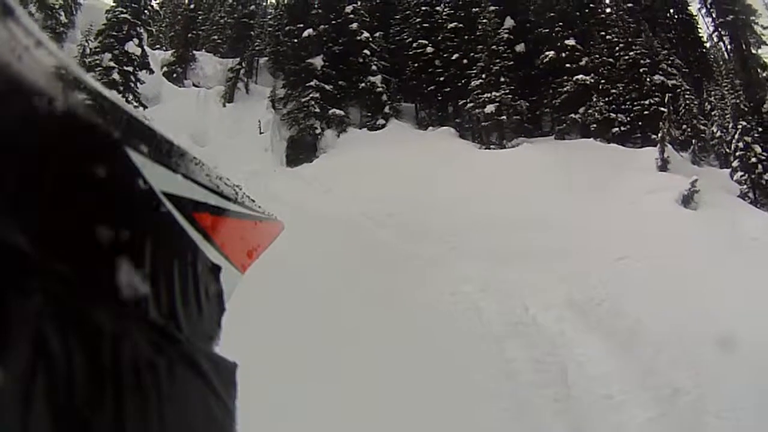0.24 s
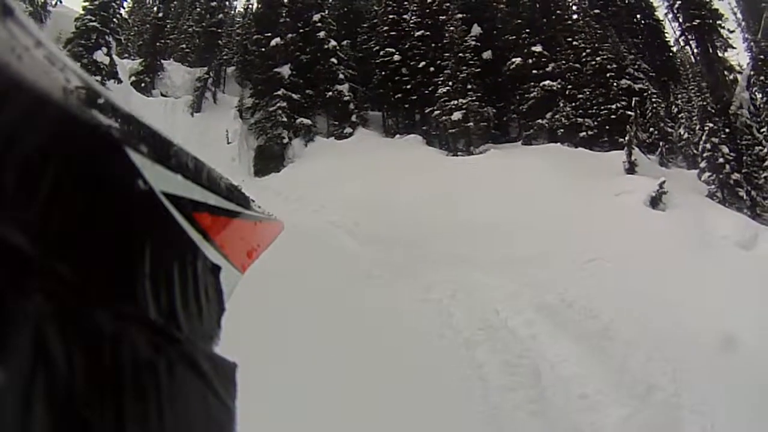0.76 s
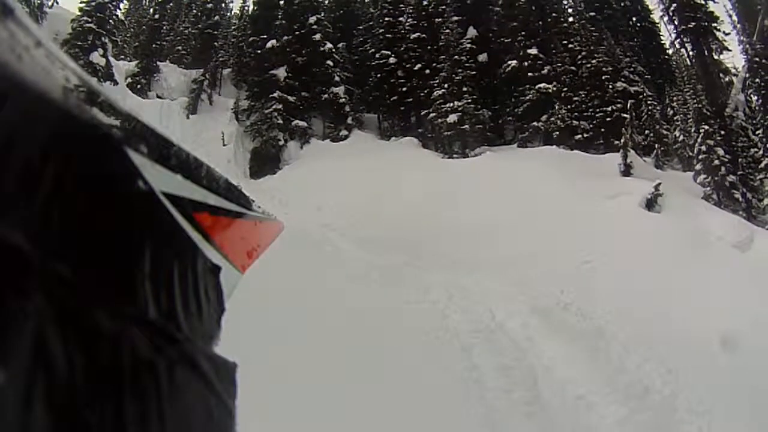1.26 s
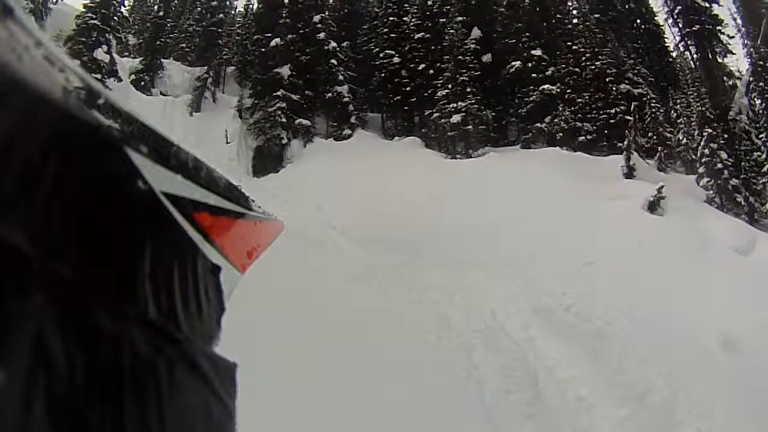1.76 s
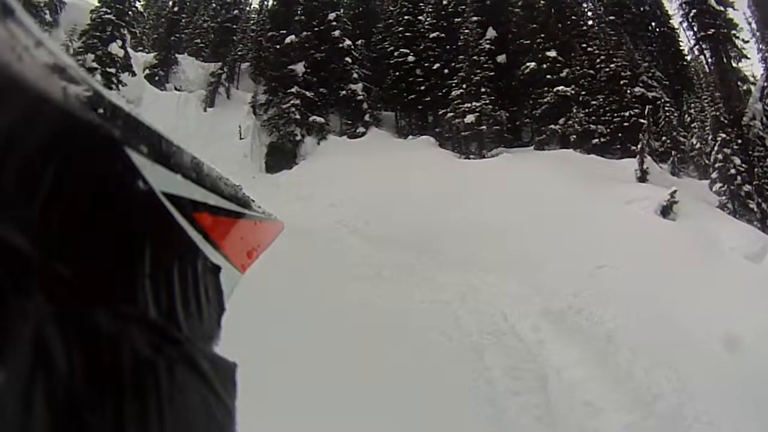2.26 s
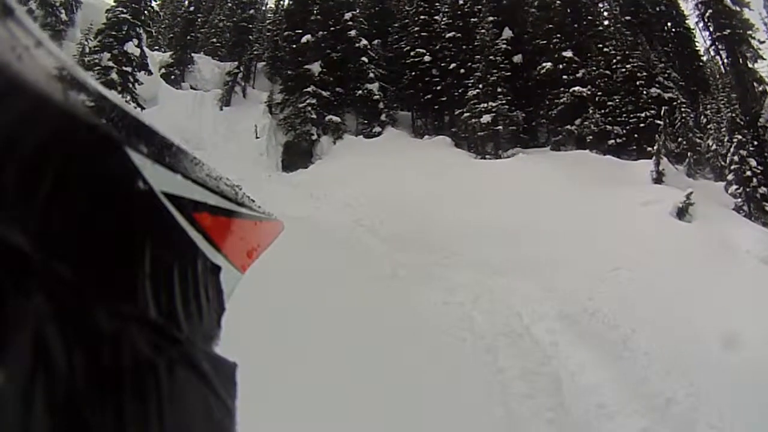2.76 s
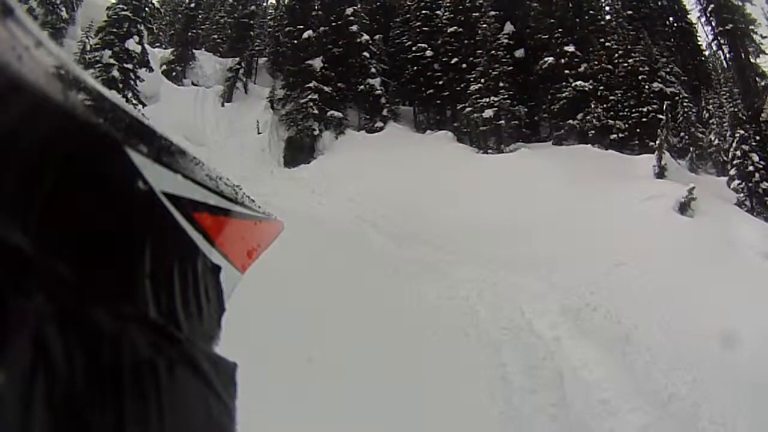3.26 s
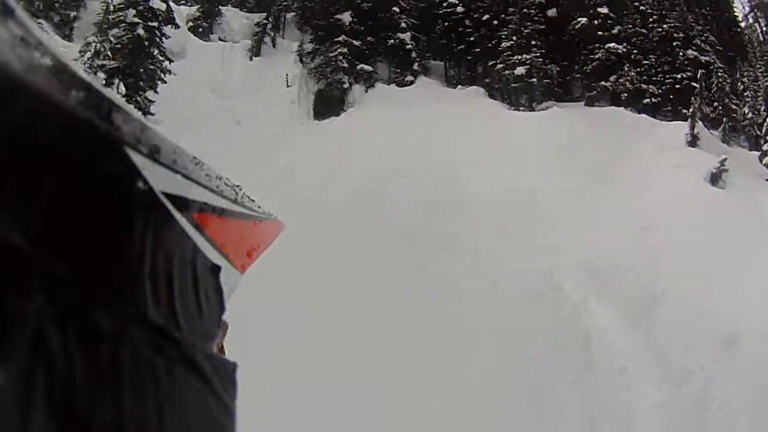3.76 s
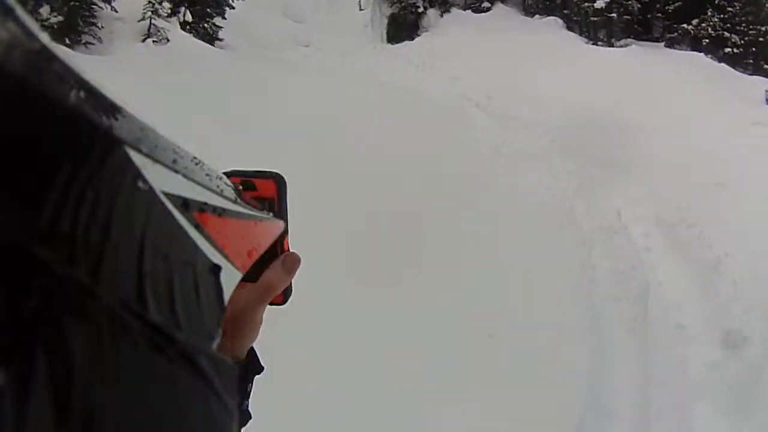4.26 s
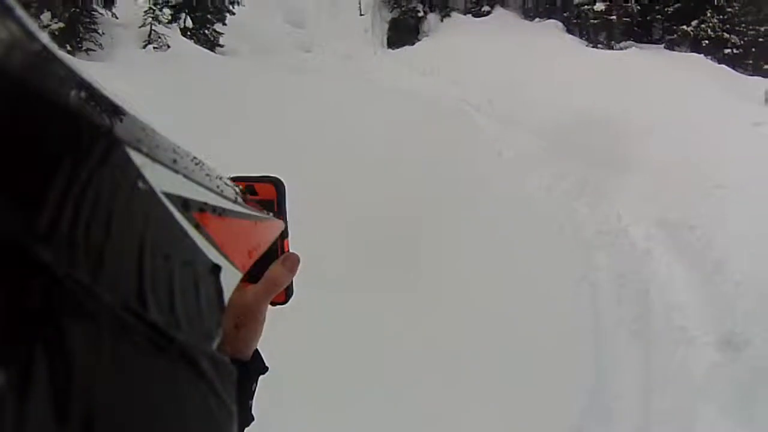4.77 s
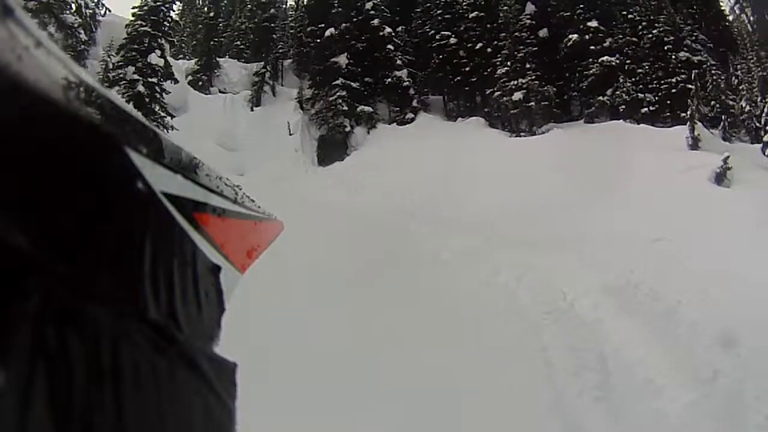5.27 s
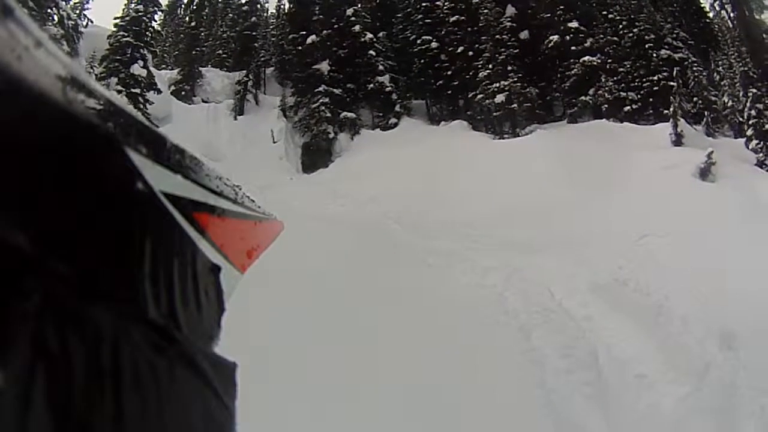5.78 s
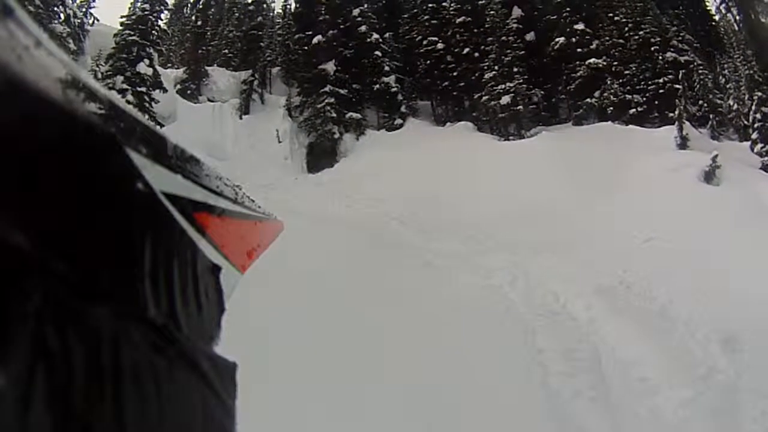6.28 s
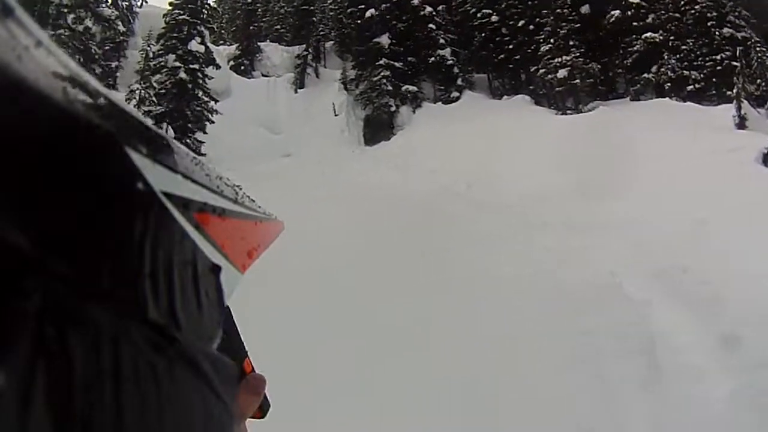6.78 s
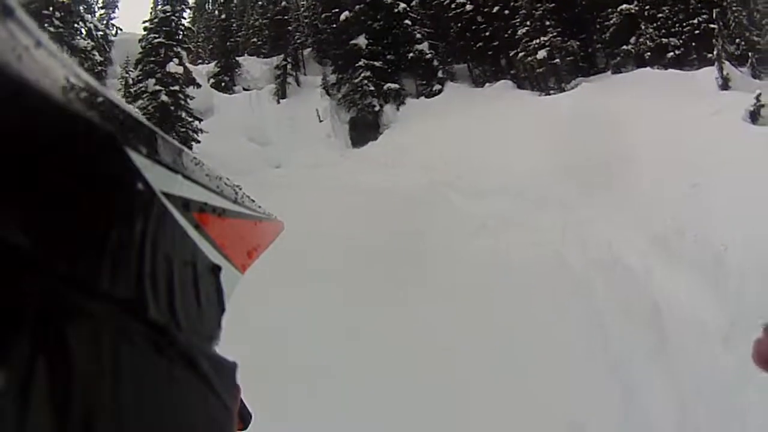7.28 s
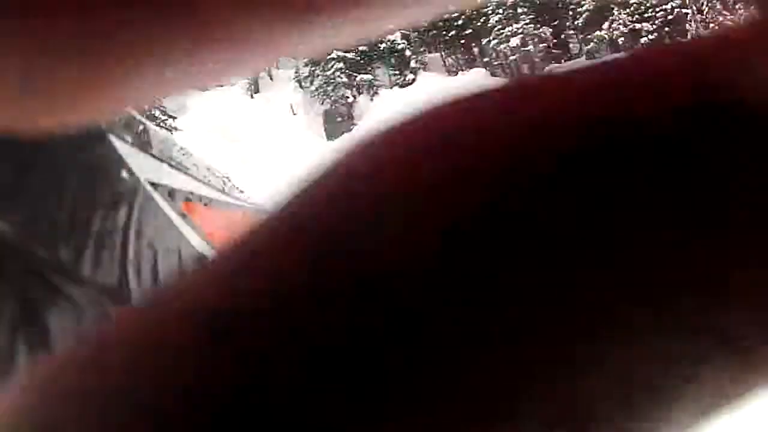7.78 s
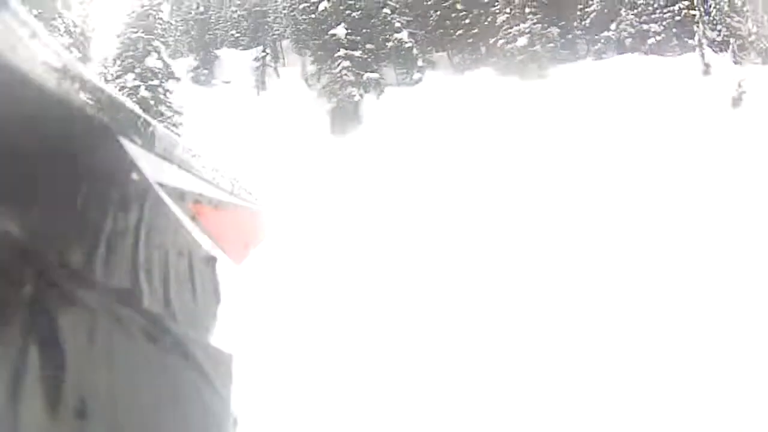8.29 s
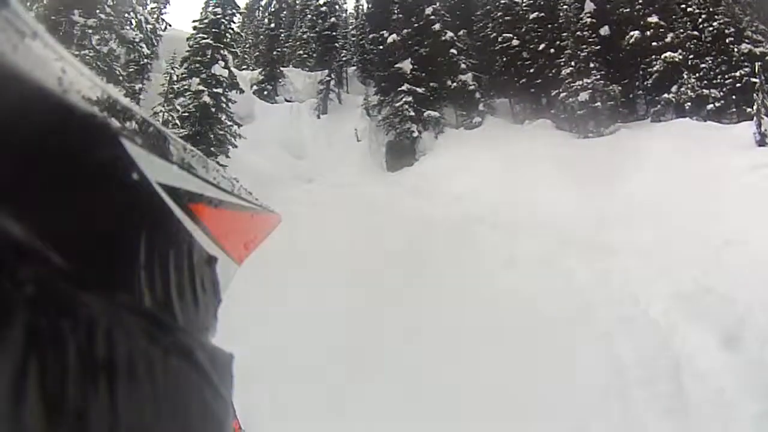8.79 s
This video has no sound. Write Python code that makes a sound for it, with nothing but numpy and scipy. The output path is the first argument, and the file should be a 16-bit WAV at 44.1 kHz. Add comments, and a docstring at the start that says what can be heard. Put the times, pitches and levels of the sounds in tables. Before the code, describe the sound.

Rough two-stroke idle putters and clatters steadily over faint hiss, then fingers rub, swish and knock loudly on the microphone's plastic case around eight seconds.

```python
"""A two-stroke twin snowmobile idles on open snow, heard from a camera worn by the rider.
Most firings are weak; about ten times a second one catches well, thumps in the exhaust and clacks the clutch.
One uneven firing sequence drives the exhaust tones and thumps, and shakes filtered noise into rattles.
Near the end a hand scrapes the camera housing, a sleeve swishes past and fingers knock on the case:
shaped noise and ringing sines. Dry clicks, hiss, low rumble and a thin whine complete the scene."""
import sys
import numpy as np
from scipy import signal
from scipy.fft import rfft, irfft
from scipy.io import wavfile
from scipy.ndimage import uniform_filter1d

SR = 44100
rng = np.random.default_rng(int(sys.argv[2]) if len(sys.argv) > 2 else 0)


def digitize_waveform(pressure):
    """Quantize a signal to 16-bit integers and store it at the path in sys.argv[1].

    Rows of a 2-D input are taken as channels; values are limited to [-1, 1].
    """
    field = np.atleast_2d(pressure).T
    bounded = np.clip(field, -1, 1)
    quanta = np.round(bounded * 32767).astype(np.int16)
    wavfile.write(sys.argv[1], SR, quanta)


N = 398663
TIME = np.arange(N) / SR  # seconds


def undb(db):
    """Turn decibels into gain."""
    return 10 ** (np.asarray(db) / 20)


def level(x, db=0):
    """Scale a sound to an rms level in dB."""
    return x * undb(db) / np.sqrt(np.mean(x ** 2))


def colour(x, points):
    """Filter by a spectrum of (Hz, dB) points that falls away beyond its ends."""
    hz, db = np.transpose(points)
    f = np.maximum(np.arange(N // 2 + 1) * SR / N, 1)
    gain = undb(np.interp(np.log(f), np.log(hz), db))
    low_end = np.minimum(f / hz[0], 1) ** 2
    high_end = np.minimum(hz[-1] / f, 1) ** 2
    return irfft(rfft(x) * gain * low_end * high_end, N)


def noise(points, grain_db=0):
    """Coloured noise of rms 1, made of tiny slips whose sizes scatter by grain_db."""
    slips = rng.standard_normal(N) * undb(grain_db * rng.standard_normal(N))
    return level(colour(slips, points))


def walk(rate):
    """Slow random wander with a spread near 1, heading for a new value `rate` times a second."""
    k = int(SR / rate)
    steps = np.repeat(rng.standard_normal(N // k + 1), k)
    return level(uniform_filter1d(steps, k)[:N])


def impulses(times, sizes):
    """Place one impulse at each time."""
    inside = (times >= 0) & (times < TIME[-1])
    return np.bincount((times[inside] * SR).astype(int), sizes[inside], N)


def fade(x, decay_s):
    """Give each impulse an exponential tail."""
    return signal.lfilter([1], [1, -np.exp(-1 / (decay_s * SR))], x)


def resonate(x, modes):
    """Lift or notch narrow bands, each given as (Hz, width in Hz, dB)."""
    f = np.arange(N // 2 + 1) * SR / N
    lift_db = sum(db / (1 + (2 * (f - hz) / width) ** 2) for hz, width, db in modes)
    return irfft(rfft(x) * undb(lift_db), N)


def strokes(rows):
    """Loudness curve of a set of hand strokes, each with a rise, a hold and a fall."""
    gain = 0
    for start, length, rise, fall, db in rows:
        ramp = np.minimum((TIME - start) / rise, (start + length - TIME) / fall)
        gain = gain + undb(db) * np.clip(ramp, 0, 1)
    return gain


# Colour of the microphone hiss. Each row: frequency in Hz, relative level in dB.
HISS_SPECTRUM = [(100, 4), (1000, 10.5), (4000, 0), (7000, -2), (9000, -2.5), (15000, -2.5)]
WHINE_HZ = 5327


def background(hiss_db=-68.5):
    """Microphone hiss, low air rumble and a thin electronic whine with its octave, made of sines."""
    whine_db, octave_db, waver_hz = -80.5, -86, 24
    turn = 2 * np.pi * np.cumsum(WHINE_HZ + waver_hz * walk(rate=200)) / SR
    whine = np.sqrt(2) * (undb(whine_db) * np.sin(turn) + undb(octave_db) * np.sin(2 * turn))
    rumble = noise([(12, -3), (24, 0), (45, -6), (90, -22)]) * undb(-60 + walk(5))
    return noise(HISS_SPECTRUM) * undb(hiss_db) + rumble + whine


# Small dry clicks. Each row: time in seconds, strength in dB before tick_db is added, brightness from 0 to 1.
CLICKS = [(0.49, -37.5, 0.4), (4.176, -44, 0.4), (5.129, -44, 0.8), (7.035, -48, 0.8), (7.452, -32.5, 0.83),
          (7.531, -30, .1), (7.672, -32, 0.2), (7.713, -30.5, 0.04), (7.786, -36, 0)]
# Colour of the dull clicks. Each row: frequency in Hz, relative level in dB.
DULL_SPECTRUM = [(500, -18.5), (1500, 0), (2700, 3.5), (3400, -8), (4400, -5.5), (6500, -10.5), (8000, -34),
                 (14000, -41)]
# Thin ring of the bright clicks. Each row: frequency in Hz, relative level in dB.
BRIGHT_SPECTRUM = [(2500, -18), (4200, 0), (5000, -10), (6300, 1), (7200, -10), (8200, -22), (12000, -32)]


def ticks(tick_db=-7):
    """Dry clicks are noise bursts that die within milliseconds, mixed from a dull and a bright colour."""
    s, db, bright = np.transpose(CLICKS)
    strength = undb(db + tick_db)
    dull_bursts = fade(impulses(s, (1 - bright) * strength), decay_s=0.0011)
    bright_bursts = fade(impulses(s, bright * strength), decay_s=0.0011)
    return dull_bursts * noise(DULL_SPECTRUM) + bright_bursts * noise(BRIGHT_SPECTRUM)


# Air pushed by the hand against the microphone port. Each row: time in seconds, strength in dB, length in seconds.
AIR_PUFFS = [(7.519, -26.5, 0.021), (7.537, -36, 0.019), (7.598, -33.5, 0.026), (8.004, -43, 0.023),
             (8.32, -39, 0.031)]


def puffs():
    """Each puff is one slow swing of air pressure."""
    out = 0
    for s, db, length in AIR_PUFFS:
        u = np.clip((TIME - s) / length, 0, 1)
        out = out + undb(db) * np.sin(2 * np.pi * u) * np.sin(np.pi * u)
    return out


# Sleeve sliding past. Each row: start, length, rise and fall in seconds, level in dB.
SLEEVE_STROKES = [(7.12, 0.7, 0.34, .05, -63.5), (7.715, 0.37, 0.14, 0.052, -49),
                  (7.955, .07, 0.027, 0.049, -38), (8.07, 0.185, 0.096, .01, -61),
                  (8.19, 0.071, 0.059, .004, -44.5), (8.4, 0.31, 0.064, .13, -65.5)]
# Colour of the sleeve. Each row: frequency in Hz, relative level in dB.
SLEEVE_SPECTRUM = [(400, -5), (600, 1), (880, -2.5), (1100, 4), (1700, -4.5), (2800, 0.5), (4300, -8.5),
                   (5600, -4.5), (7000, -15.5), (8200, -18.5), (10000, -40.5), (12300, -30), (14000, -51)]
# Palm pressing on the case. Each row: start, length, rise and fall in seconds, level in dB.
PALM_STROKES = [(7.35, 0.023, 0.0088, .015, -67), (7.507, 0.054, 0.0038, .03, -36.5),
                (7.605, 0.063, 0.0035, 0.028, -48.5), (7.96, 0.057, 0.033, 0.034, -30.5),
                (8.06, 0.02, 0.005, 0.015, -45), (8.245, 0.083, 0.0061, 0.045, -27.5),
                (8.31, 0.042, .005, .02, -35)]
# Colour of the palm's rub. Each row: frequency in Hz, relative level in dB.
PALM_SPECTRUM = [(25, -12), (55, 13), (100, -6), (220, 8), (330, 2), (520, 1.5), (850, -16), (1100, -12),
                 (1600, -21), (4000, -35)]
# Fingers dragging on the housing. Each row: start, length, rise and fall in seconds, level in dB.
FINGER_STROKES = [(7.5042, 0.079, .0012, 0.033, -23), (7.600, 0.069, 0.0039, 0.038, -31),
                  (7.972, 0.031, .012, 0.014, -56), (8.2605, 0.0084, 0.00079, 0.0031, -37.5),
                  (8.274, 0.011, .001, .004, -40), (8.285, 0.058, 0.011, 0.018, -31.5),
                  (8.3045, 0.022, 0.0037, 0.014, -28)]
# Colour of the finger scrape. Each row: frequency in Hz, relative level in dB.
FINGER_SPECTRUM = [(150, -43), (380, -1.5), (650, -3), (850, -16), (1070, 1.5), (1600, -10.5), (2500, 3.5),
                   (3300, -1), (4200, 6), (5600, 2), (6600, -7.5), (8300, -9), (10000, -24.5),
                   (13000, -24.5), (15000, -40)]


def hand():
    """Rubbing is noise: gritty finger scrapes, a softer sleeve swish and a dull palm, plus puffs of air."""
    scrapes = strokes(FINGER_STROKES) * noise(FINGER_SPECTRUM, grain_db=2.0) * undb(0.85 * walk(270))
    sleeve = strokes(SLEEVE_STROKES) * noise(SLEEVE_SPECTRUM, grain_db=3) * undb(1.4 * walk(90))
    palm = strokes(PALM_STROKES) * noise(PALM_SPECTRUM)
    return scrapes + sleeve + palm + puffs()


# Fingers knocking on the case.
# Each row: time in seconds, strength in dB, pitch of the ring as a ratio, number of touches.
FINGER_KNOCKS = [(6.857, -45, 1.3, 1), (7.130, -49, 2.7, 1), (7.169, -52, 3.0, 1), (7.201, -43, 1.1, 1),
                 (7.226, -47, 3.0, 1), (7.362, -37, 0.44, 1), (7.786, -39.5, 1.35, 1),
                 (8.025, -33, 0.59, 1), (8.075, -37.5, 1.23, 1), (8.253, -17, 1.52, 4),
                 (8.2992, -16, 0.42, 1), (8.3052, -7, 1.04, 1), (8.3151, -12, 1.09, 1),
                 (8.730, -51.5, 2.57, 1), (8.818, -54, 1.6, 1)]
SKIP_S = .0072  # seconds between the touches of a skipping finger


def touches():
    """List every contact as (seconds, dB, pitch ratio); a skipping finger rings a little differently each time."""
    grip_spread = .12
    contacts = []
    for s, db, pitch, count in FINGER_KNOCKS:
        for k in range(round(count)):
            shift = (k > 0) * grip_spread * rng.uniform(-1.14, 1)
            contacts.append((s + k * SKIP_S, db, pitch * (1 + shift)))
    return contacts


# Crack of a fingertip meeting the plastic. Each row: frequency in Hz, relative level in dB.
CRACK_SPECTRUM = [(900, -12), (1350, 1), (1700, -9), (2250, 4), (3000, -24), (6000, -31)]


def cracks(crack_db=-24):
    """A few milliseconds of noisy crackle at the start of each knock."""
    s, db, _ = np.transpose(touches())
    return fade(impulses(s, undb(db + crack_db)), decay_s=0.0096) * noise(CRACK_SPECTRUM)


# Ringing of the case. Each row: frequency in Hz at pitch ratio 1, time to fall 60 dB in seconds, level in dB.
CASE_MODES = [(180, .018, -34), (415, 0.024, 4), (560, 0.021, -4.5)]
# A thin part of the mount rings on after knocks and also hums faintly throughout.
# One row: frequency in Hz, time to fall 60 dB in seconds, level of its ring in dB.
MOUNT_MODE = (895, 0.2, -32)
CONTACT_S = 0.0009  # contact time at pitch ratio 1; a harder touch is shorter and rings higher


def knocks():
    """Each knock is a short push that rings the case; the grip shifts the pitch."""
    t, out = TIME[:SR // 5], np.zeros(N)
    for s, db, pitch in touches():
        modes = [(hz * pitch, t60, mode_db) for hz, t60, mode_db in CASE_MODES] + [MOUNT_MODE]
        ring = sum(undb(mode_db - 60 * t / t60) * np.sin(2 * np.pi * hz * t) for hz, t60, mode_db in modes)
        push = np.sin(np.pi * np.minimum(t * pitch / CONTACT_S, 1))
        start = int(s * SR)
        out[start:start + len(t)] -= undb(db) * signal.fftconvolve(ring, push / push.sum())[:len(t)]
    return out


# Loudness of the low rattle and rustle, and of the metal clatter, over time;
# the rises near 7.3 and 9 s are probably clothing as the arm moves.
# Each row: time in seconds, low level and metal level in dB, before each sound's own trim is added.
LOUDNESS = [(0, -60.5, -67.5), (1.3, -62, -69), (3.6, -61, -68.5), (4.1, -59.5, -65.5), (4.85, -59, -65.5),
            (5.4, -61, -67.5), (6.6, -61.5, -67), (7.3, -54, -65), (8.65, -59, -68), (9.0, -53.5, -63.5)]
# Colour of the low rattle and rustle. Each row: frequency in Hz, relative level in dB.
RATTLE_SPECTRUM = [(80, -10), (170, 1), (250, -2), (330, -2.5), (400, 4), (510, 0), (570, -6), (650, -1),
                   (800, -10), (950, -31), (1120, -12.5), (1400, -12), (1800, -27), (2400, -50)]
# Resonances of the low rattle: panels, and near 1070 Hz probably the camera housing.
# Each row: frequency in Hz, width in Hz, lift in dB.
RATTLE_MODES = [(318, 24.5, 5), (380, 55, 2), (437, 8.2, -5), (462, 40, 3), (518.5, 31, 6.5), (592, 25, 5),
                (1066, 128, 13.5)]
# Colour of the metal clatter. Each row: frequency in Hz, relative level in dB.
CLATTER_SPECTRUM = [(900, -13.5), (1600, -0.5), (2100, 1), (2350, -4), (2700, 1), (3200, -5.5), (3800, -6),
                    (4500, -11.5), (6500, -13.5), (10000, -47)]
# Resonances of the drive metal. Each row: frequency in Hz, width in Hz, lift in dB.
METAL_MODES = [(2120, 60, 7.5), (2190, 90, -7), (2314, 43.7, 10), (2535, 45, 5), (2663, 39, 1.5),
               (3600, 79, 6)]


def machinery(times, size, low_trim_db=-1, clatter_trim_db=-3, slap_lead_s=0.0025, mount_db=-83):
    """Firings shake resonant noise into a low rattle and a metal clatter; the mount hums steadily."""
    s, *columns = np.transpose(LOUDNESS)
    low_db, clatter_db = (np.interp(TIME, s, c) for c in columns)
    shake = 1.0 + fade(impulses(times, size), decay_s=0.0028)
    low = level(resonate(shake * noise(RATTLE_SPECTRUM), RATTLE_MODES)) * undb(low_db + low_trim_db)
    # piston slap reaches the ear before the gas has left the pipe
    force = np.minimum(size, .8) * undb(2.0 * rng.standard_normal(len(times)))
    slaps = fade(impulses(times - slap_lead_s, force ** 2), decay_s=0.011)
    rattle = 0.28 + 0.38 * np.sqrt(slaps)
    metal = resonate(rattle * noise(CLATTER_SPECTRUM, grain_db=4.0), METAL_MODES)
    clatter = level(metal) * undb(clatter_db + clatter_trim_db)
    hum_angle = 2 * np.pi * np.cumsum(MOUNT_MODE[0] + 4 * walk(12)) / SR
    hum = undb(mount_db + 1.1 * walk(11)) * np.sqrt(2) * np.sin(hum_angle)
    return low + clatter + hum


# Ringing of the loose clutch parts. Each row: frequency in Hz, width in Hz, relative level in dB.
CLUTCH_MODES = [(2045, 82, 4), (2460, 76, 2.5), (2686, 71, 3.5), (3200, 160, -3.5), (3500, 69, 0),
                (3850, 150, -2)]


def clutch(times, size, caught, clack_db=4.5, rebound_db=0.5, scatter_db=1.0, lead_s=.0095, chatter_s=0.0084):
    """Loose parts chatter briefly as each catch jerks the crank, and often two turns earlier as it slows."""
    slack_share, slack_firings = .6, 4  # two firings make one turn
    chance = undb(scatter_db * rng.standard_normal((len(caught), 2))).T
    slack = rng.random(len(caught)) < slack_share
    jerks = impulses(times[caught] - lead_s, np.sqrt(size[caught]) * chance[0])
    rebounds = impulses(times[caught - slack_firings] - lead_s, slack * undb(rebound_db) * chance[1])
    s, _, metal_db = np.transpose(LOUDNESS)
    chatter = rng.standard_normal(N) * fade(jerks + rebounds, chatter_s)
    contacts = chatter * undb(clack_db + np.interp(TIME, s, metal_db))
    t = TIME[:SR // 20]
    ring = 0
    for k, (hz, width, mode_db) in enumerate(CLUTCH_MODES):
        tail = width * np.exp(-np.pi * width * t)
        ring = ring + (-1) ** k * undb(mode_db) * tail * np.sin(2 * np.pi * hz * t)
    return signal.fftconvolve(contacts, ring / np.linalg.norm(ring))[:N]


FIRING_HZ = 114.5  # average rate, two firings per turn of the crank
# The engine catches every few turns, never sooner than the cylinder can clear.
MEAN_TURNS, FEWEST_TURNS = 5.9, 3
# An ordinary catch: strength, gain for each further turn spent gathering fuel, and scatter.
CATCH_DB, CHARGE_DB_PER_TURN, CATCH_SCATTER_DB = 0.6, 0.8, 1.15
# The hardest catches, which stand out of the idle. Each row: time in seconds, strength in dB.
STRONGEST_CATCHES = [(0.523, 3.5), (1.379, 2), (1.781, 2.5), (2.429, 1), (3.547, 2), (4.069, 3.5),
                     (4.385, 2), (4.664, 2), (5.448, 2), (5.798, 4), (6.077, 4.5), (6.357, 4), (6.814, 5.5),
                     (7.303, 6.5), (8.44, 6), (8.719, 1.5)]


def catches():
    """Between the hard catches others come at random, stronger after a longer wait; waits count turns."""
    turn_hz = FIRING_HZ / 2
    marks = [(-.3, CATCH_DB)] + STRONGEST_CATCHES + [(TIME[-1] + .3, CATCH_DB)]
    times, waits, strengths = [marks[0][0]], [], []
    for (start, _), (end, hard_db) in zip(marks, marks[1:]):
        turns = round((end - start) * turn_hz)
        count = round(turns / MEAN_TURNS)
        # share the spare turns out at random
        shares = np.cumsum(rng.uniform(.1, 1, count))
        spare = np.round((turns - FEWEST_TURNS * count) * shares / shares[-1]).astype(int)
        wait = FEWEST_TURNS + np.diff(spare, prepend=0)
        scatter = CATCH_SCATTER_DB * rng.standard_normal(count)
        db = CATCH_DB + CHARGE_DB_PER_TURN * (wait - MEAN_TURNS) + scatter
        times += list(start + (end - start) * np.cumsum(wait) / turns)
        waits += list(wait)
        strengths += list(db[:-1]) + [hard_db]
    return np.array(times), np.array(waits), np.array(strengths[:-1])


def crank(catch_s, waits):
    """Count firings over time: each catch kicks the crank faster, then it coasts down until the next."""
    kick = .03
    gaps = 2 * waits  # in firings
    count = np.concatenate([[0], np.cumsum(gaps)])
    firings = np.arange(count[-1])
    since = firings - np.repeat(count[:-1], gaps)
    early = kick * since * (1 - since / np.repeat(gaps, gaps))
    times = np.interp(firings - early, count, catch_s)
    return np.interp(TIME, times, firings), times, count[1:-1]


def combustion(count, caught, catch_db, other=0.1, before=0.57, after=0.21):
    """Strength of every firing: feeble ones, and a cluster of stronger ones around each catch."""
    weak, scatter_db = .13, 2.5
    chance = undb(scatter_db * rng.standard_normal((count, 2))).T
    surge = np.zeros(count)
    surge[caught] = undb(catch_db)
    # the same cylinder fires fairly well one turn before and less well one turn after, its partner in between
    neighbours = before * np.roll(surge, -2) + other * np.roll(surge, 1) + after * np.roll(surge, 2)
    ordinary = np.minimum(weak * chance[0] + neighbours * chance[1], 1)
    return np.where(surge > 0, surge, ordinary)


# Steady pulsing of the exhaust. Each row: multiple of the crank speed, middle level in dB.
DRONE_TONES = [(1, -60.5), (2, -57), (3, -94), (4, -63.5), (5, -72)]
# Colour of the exhaust thump. Each row: frequency in Hz, relative level in dB.
THUMP_SPECTRUM = [(15, -1), (28, 31), (52, 4), (72, -30), (100, -12), (125, 0.5), (150, -8), (200, 1),
                  (280, 2.5), (320, -9.5), (400, -9.5), (600, -25), (900, -33), (2000, -38)]


def exhaust(phase, times, size, thump_db=-60, pipe_db=-58, pipe_hz=107, pipe_decay_s=0.01):
    """A drone locked to the crank, a thump per firing, and the muffler ringing just below the firing rate."""
    strong = impulses(times, np.minimum(size, 1) ** 2)
    # near the muffler's resonance, strong firings pull the main tone ahead and it slips back between them
    pull, settle_s = 1.1, .04
    lead = pull * uniform_filter1d(fade(strong, settle_s), SR // 60)
    drone = 0
    for k, db in DRONE_TONES:
        angle = np.pi * k * phase + (k == 2) * (lead - lead.mean())
        drone = drone + np.sqrt(2) * undb(db + walk(13)) * np.cos(angle)
    thumps = level(colour(impulses(times, size), THUMP_SPECTRUM), thump_db)
    t = TIME[:SR // 4]
    ring = -np.sin(2 * np.pi * pipe_hz * t) * np.exp(-t / pipe_decay_s)
    muffler = level(signal.fftconvolve(strong, ring)[:N], pipe_db)
    return drone + thumps + muffler


# Turbulent gas in the muffler. Each row: frequency in Hz, relative level in dB.
GAS_SPECTRUM = [(75, -15), (98, 7), (112, -15.5), (135, -5.5), (165, -11.5), (205, -9), (250, -16)]


def engine(gas_db=-61):
    """One uneven firing sequence drives the exhaust and the rattles; gas burbles on as steady noise."""
    catch_s, waits, catch_db = catches()
    phase, times, caught = crank(catch_s, waits)
    size = combustion(len(times), caught, catch_db)
    gas = noise(GAS_SPECTRUM) * undb(gas_db)
    return exhaust(phase, times, size) + gas + machinery(times, size) + clutch(times, size, caught)


def scene():
    """Snow swallows all echoes, so every source arrives dry."""
    return (background() + ticks() + hand() + cracks() + knocks() + engine())[None]


TOP_HZ = 15400


def record(dry):
    """The camera cuts the highest treble; its converter sits slightly below zero."""
    offset = -.0092
    low_pass = signal.ellip(10, .2, 70, TOP_HZ, fs=SR, output="sos")
    return signal.sosfilt(low_pass, dry) + offset


dry = scene()
out = record(dry)
digitize_waveform(out)
```